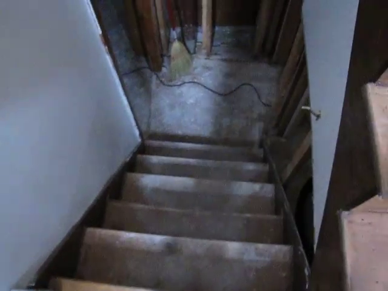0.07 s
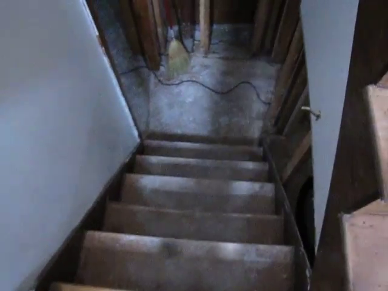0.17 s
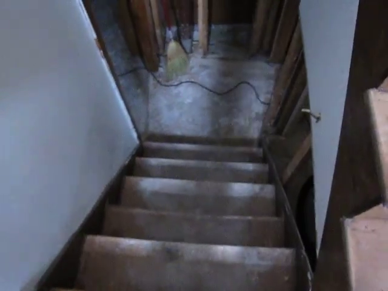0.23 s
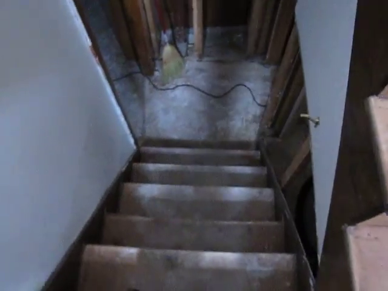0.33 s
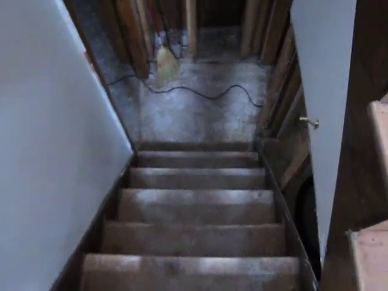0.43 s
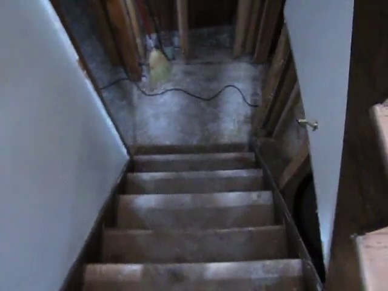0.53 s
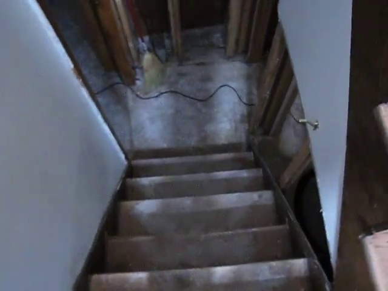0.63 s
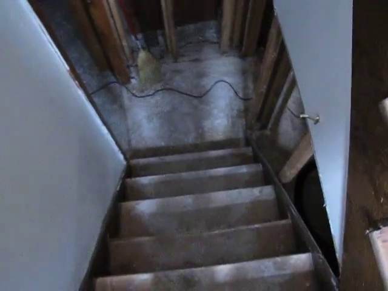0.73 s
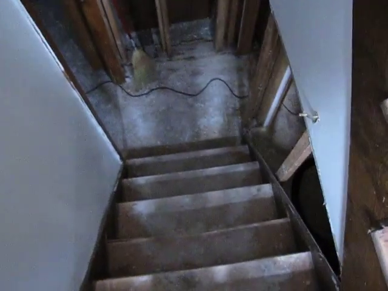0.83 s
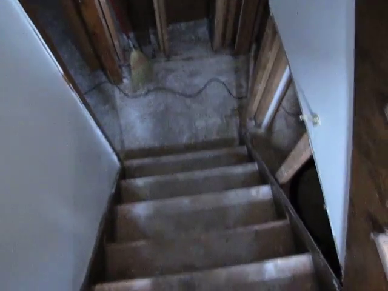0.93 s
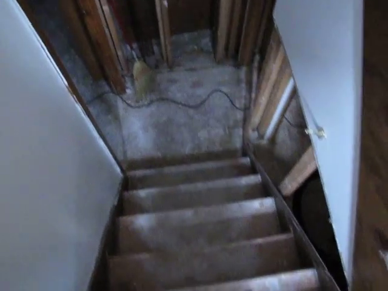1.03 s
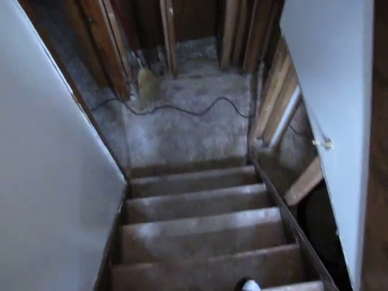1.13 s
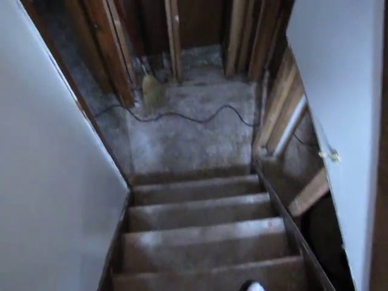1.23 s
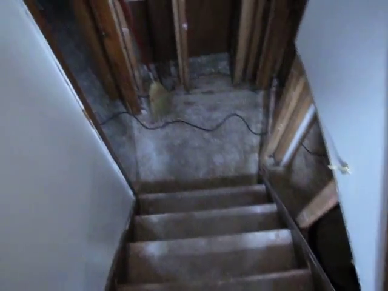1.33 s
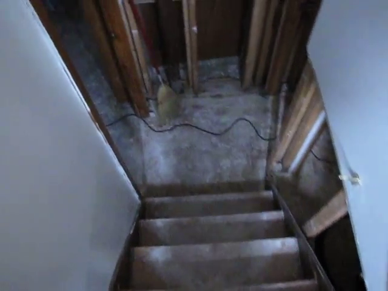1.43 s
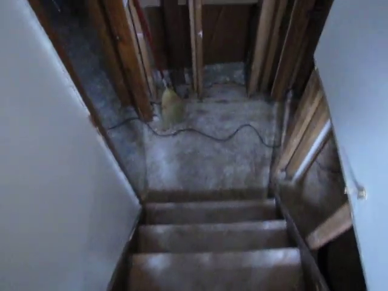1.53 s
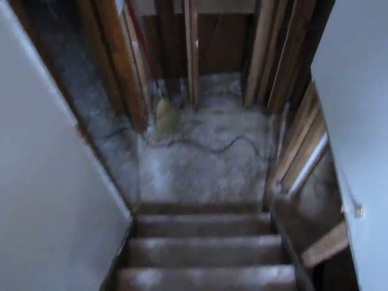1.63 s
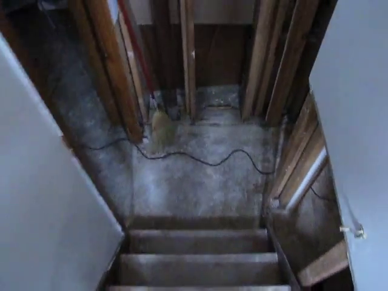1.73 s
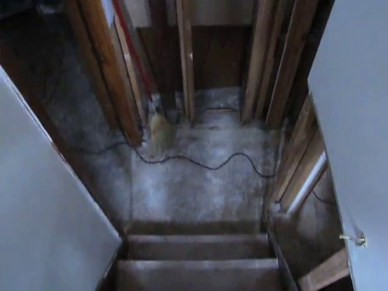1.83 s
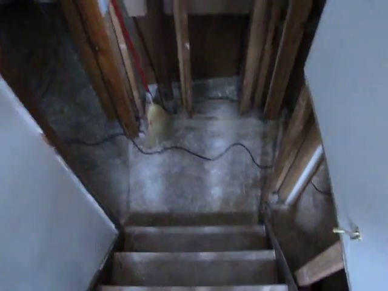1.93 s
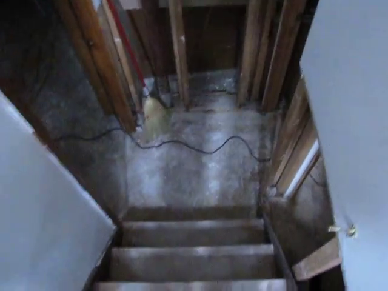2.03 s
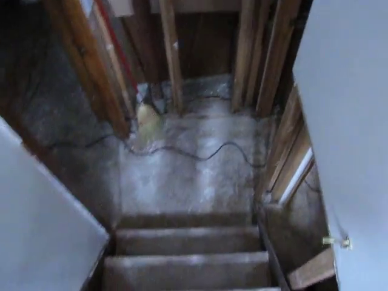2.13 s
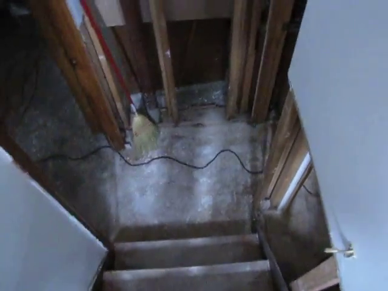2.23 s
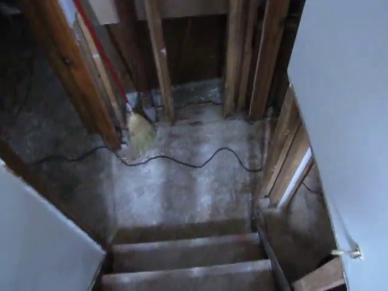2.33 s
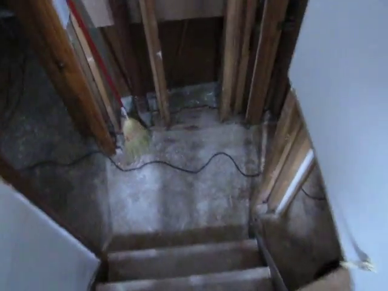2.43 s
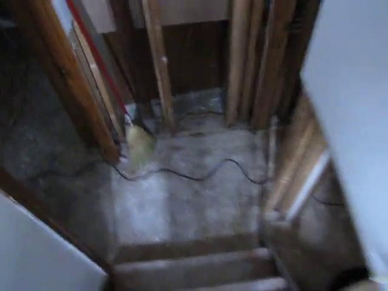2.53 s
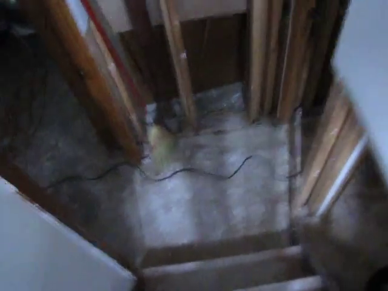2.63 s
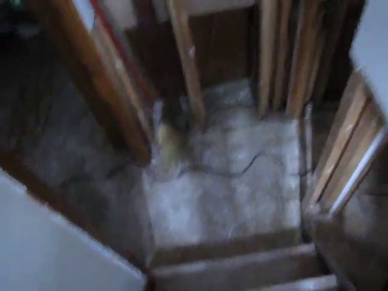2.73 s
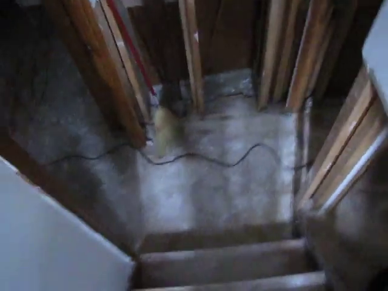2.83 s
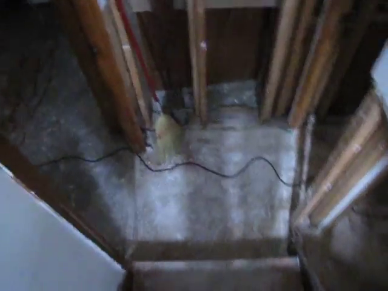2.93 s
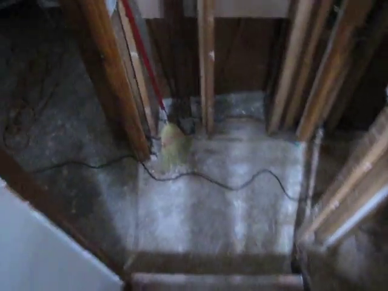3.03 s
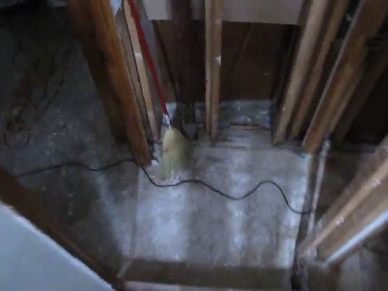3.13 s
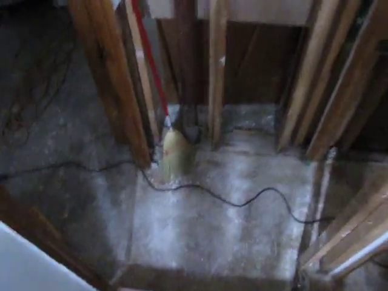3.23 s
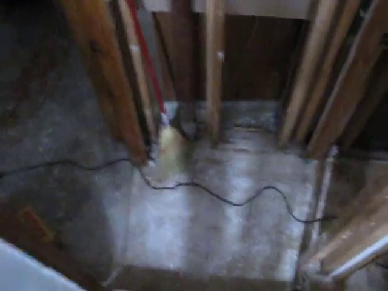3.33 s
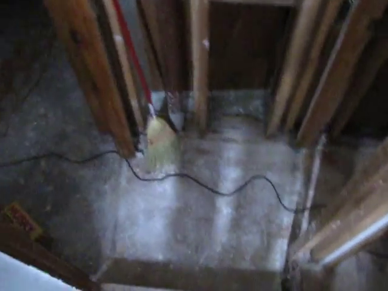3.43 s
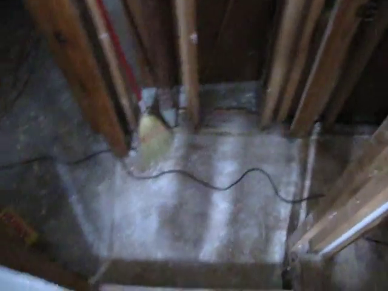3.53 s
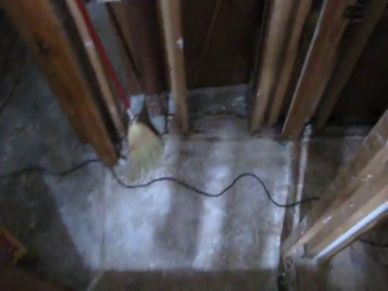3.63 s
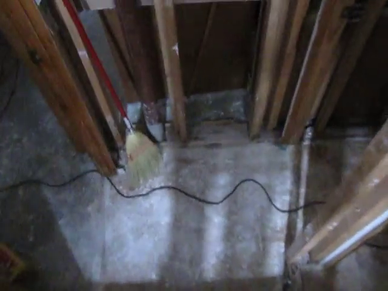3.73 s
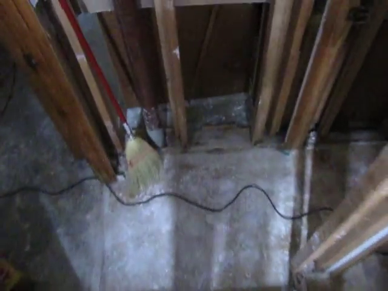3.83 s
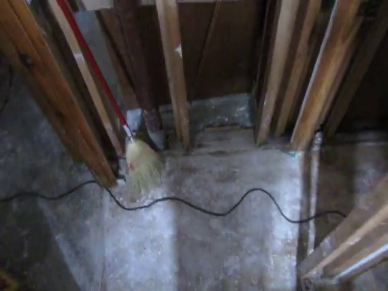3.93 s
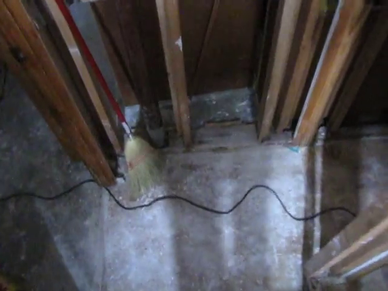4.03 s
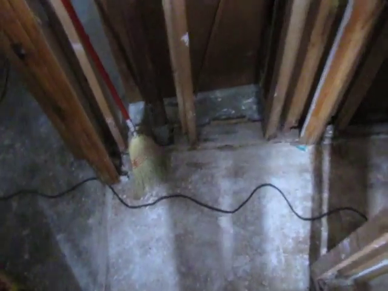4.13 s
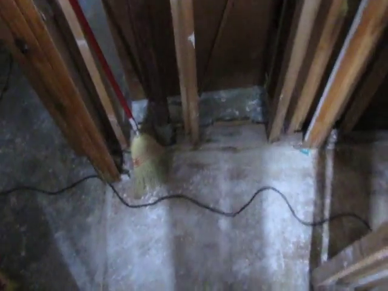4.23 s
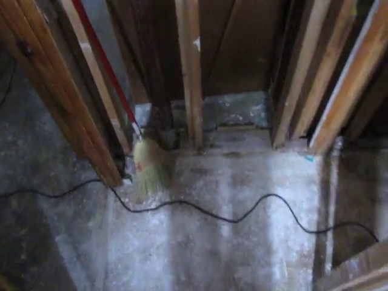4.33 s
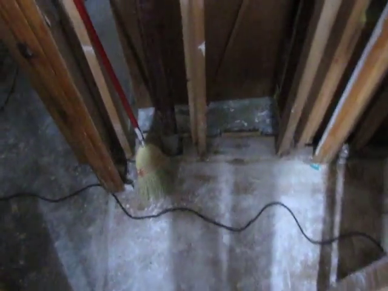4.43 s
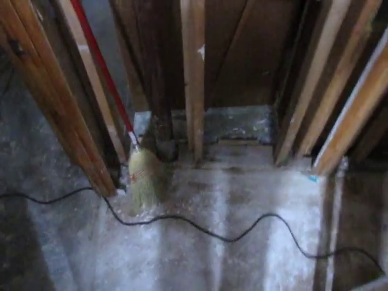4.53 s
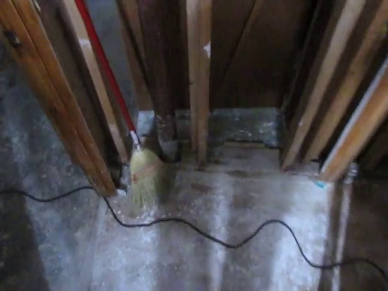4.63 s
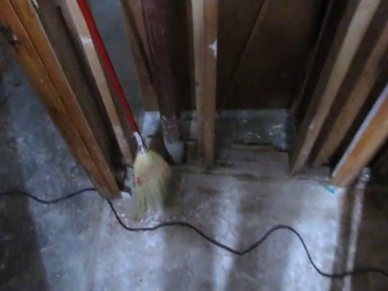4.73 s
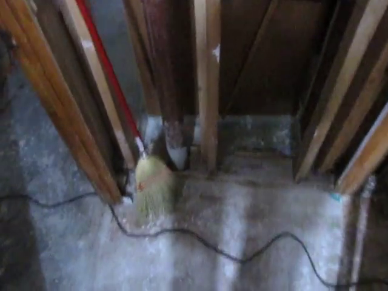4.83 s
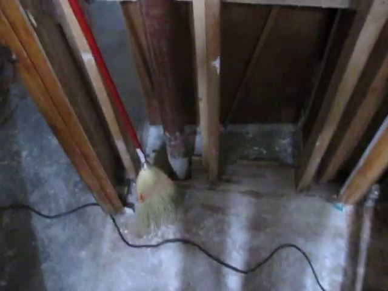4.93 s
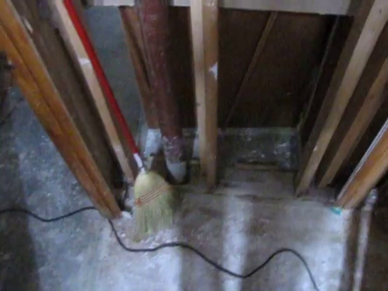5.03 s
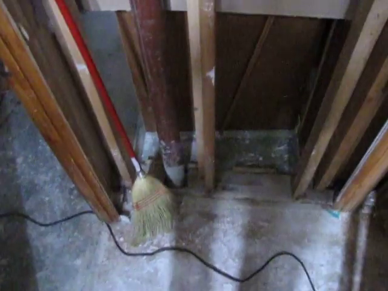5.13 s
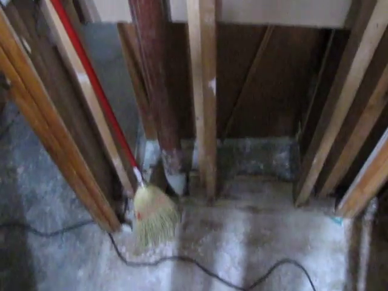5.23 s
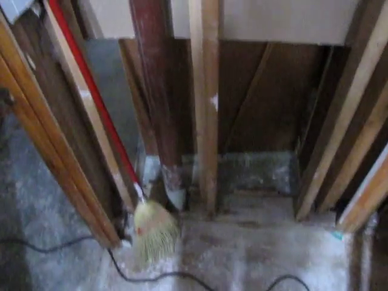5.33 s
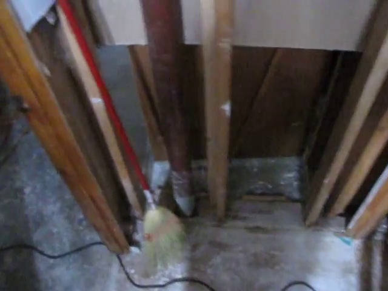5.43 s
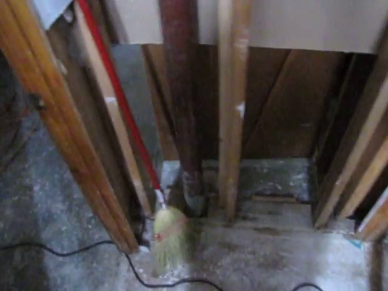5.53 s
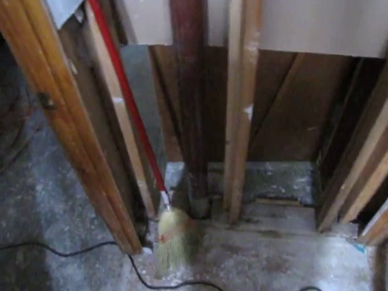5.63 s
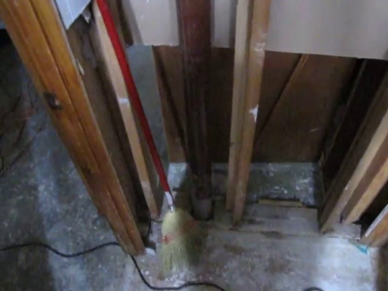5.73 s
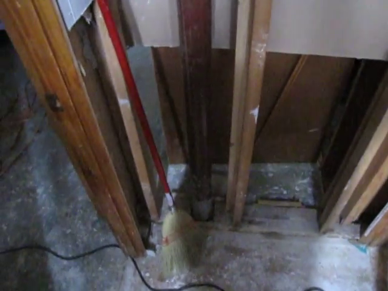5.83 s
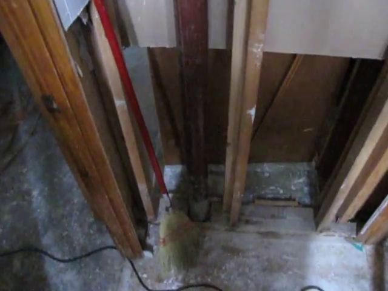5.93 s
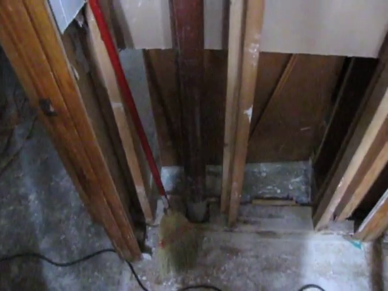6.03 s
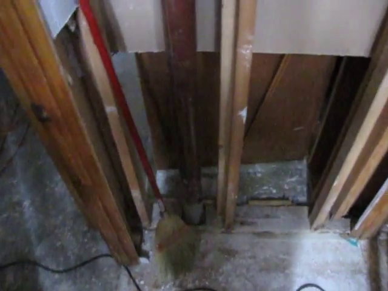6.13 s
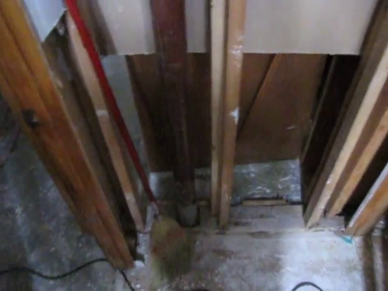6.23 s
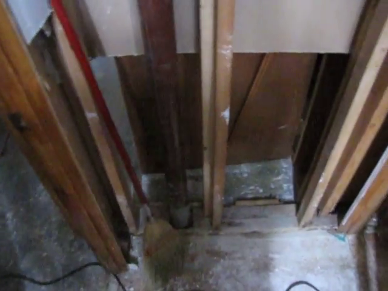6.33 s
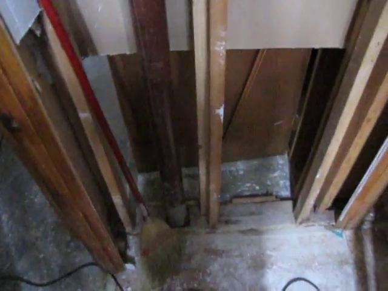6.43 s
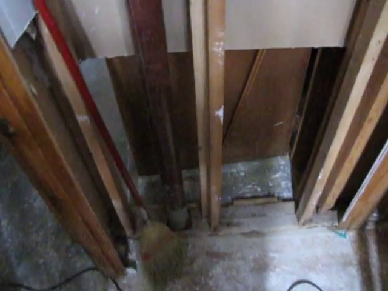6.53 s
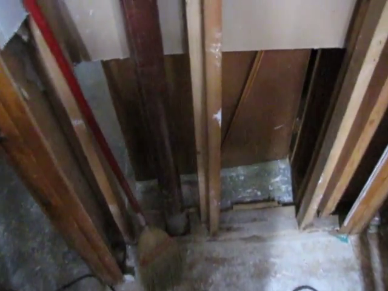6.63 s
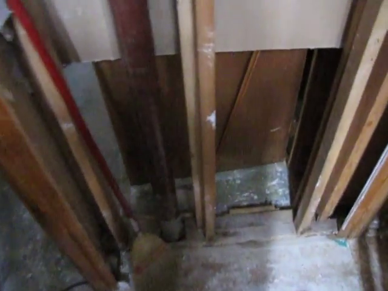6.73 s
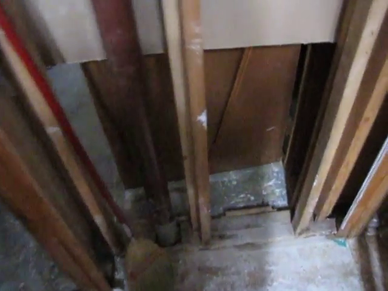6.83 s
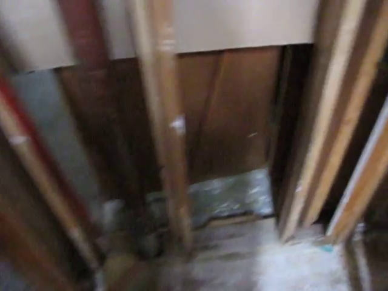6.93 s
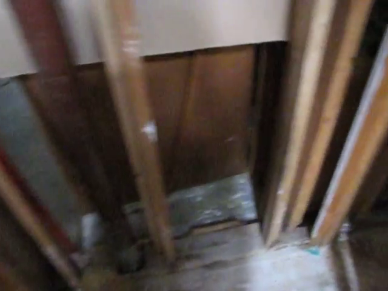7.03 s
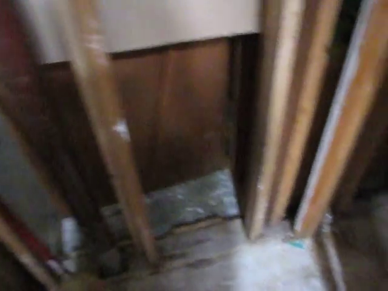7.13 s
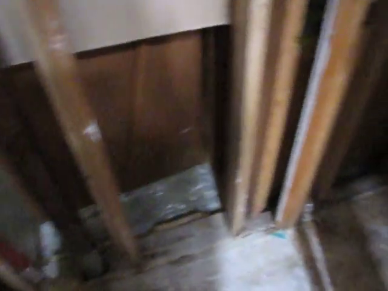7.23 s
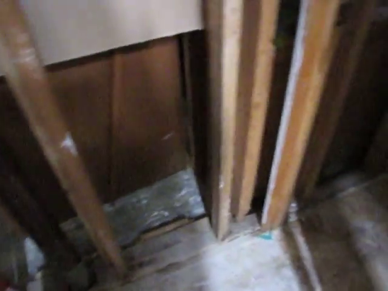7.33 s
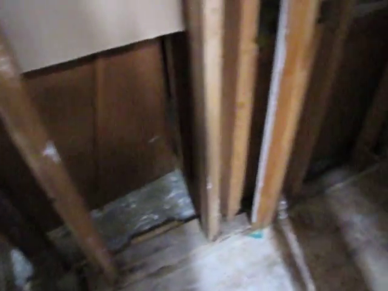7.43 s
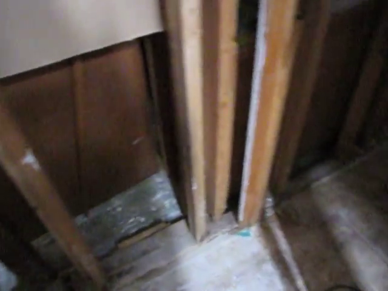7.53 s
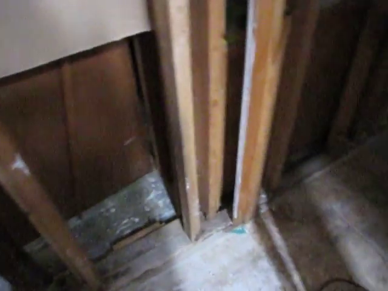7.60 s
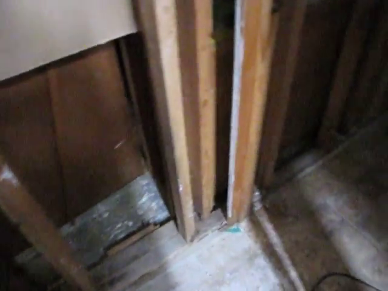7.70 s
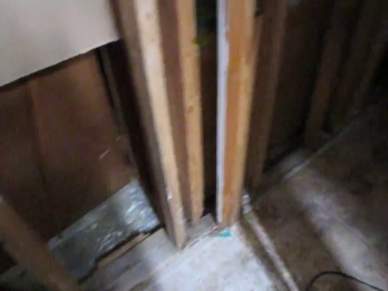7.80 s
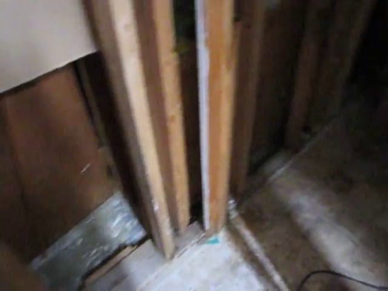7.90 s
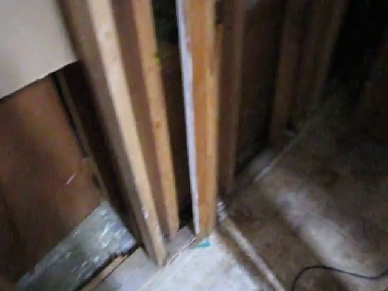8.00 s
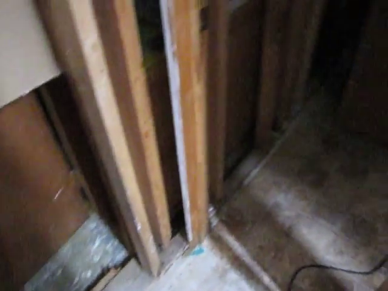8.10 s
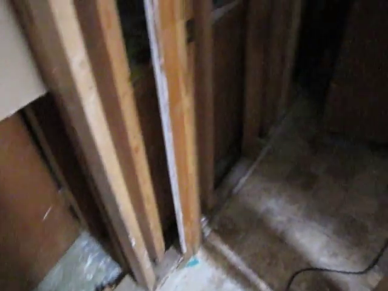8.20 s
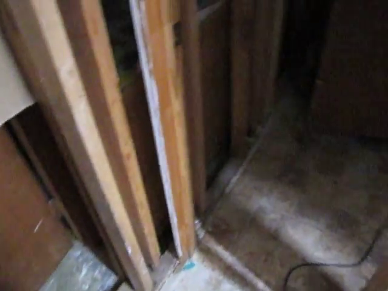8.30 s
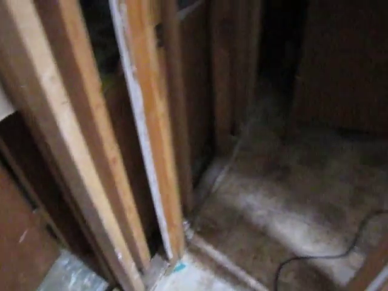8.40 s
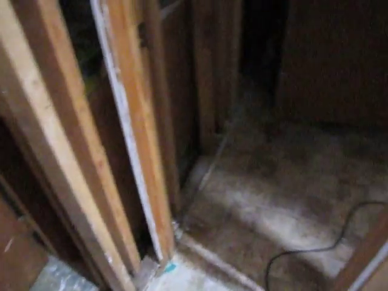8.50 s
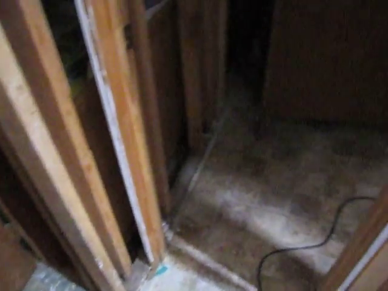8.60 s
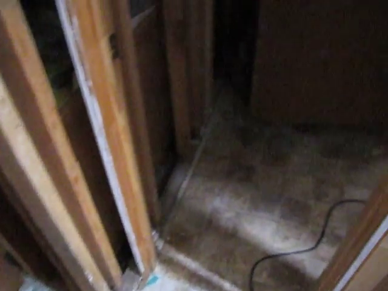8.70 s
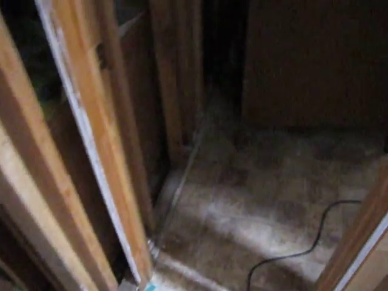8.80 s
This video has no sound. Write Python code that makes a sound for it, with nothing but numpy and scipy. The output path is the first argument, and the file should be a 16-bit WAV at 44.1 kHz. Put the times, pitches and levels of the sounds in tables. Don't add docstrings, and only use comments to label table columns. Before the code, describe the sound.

Someone goes down bare wooden stairs into a basement, heard close in stereo. A faint gritty scuff opens, then from 0.4 to 0.8 s a cluster of hollow knocks and pats on the landing boards. Between 1.0 and 1.55 s loose joints pop and crack in quick succession, and at about 1.65 s a tread sags with a short falling note under a heavy low boom. Paired knocks follow near 2.0, 2.1, 2.3 and 2.5 s, another deep thud at 3.2 s, and sharp gritty slaps around 3.9 to 4.0 s. A dense rattle of woody knocks runs from 4.4 to 4.9 s, with a last soft tread at 5.3 s. Then it is nearly quiet: a light tap at 6.8 s, dull shoe rubs on concrete around 7, a small click at 7.8 and tiny ticks until 8.75 s. Short stairwell echoes, faint hiss and low rumble throughout.

```python
import sys
import numpy as np
from scipy import signal
from scipy.fft import rfft, irfft
from scipy.io import wavfile

SR = 44100
rng = np.random.default_rng(int(sys.argv[2]) if len(sys.argv) > 2 else 0)


def output_pcm(signal):
    pcm = np.clip(np.atleast_2d(signal).T, -1, 1) * 32767
    wavfile.write(sys.argv[1], SR, np.round(pcm).astype(np.int16))


def attenuation_scalar(level_db):
    decades = np.asarray(level_db, float) / 20
    return 10 ** decades


N = 390705

# [f/Hz, level per Hz/dB]
AIR_SPECTRUM = [(12, -37), (20, -21), (53, -8), (71, -0.5), (195, -15), (332, -11.5), (616, -17.5),
                (863, -15.5), (1510, -20.5), (3140, -24.5), (5070, -23), (14700, -38), (16500, -56)]
# [f/Hz, correlation]
AIR_LIKENESS = [(60, 0.85), (180, 0.54), (550, 0.44), (1650, 0.3), (4970, -0.072), (15000, 0.65)]
KNOCK_LIKENESS = [(60, 0.97), (150, 1), (380, 0.97), (950, 0.87), (2380, 0.43), (5980, 0.59), (15000, 0.53)]
# [f/Hz, left minus right/dB]
LEAN = [(60, -0.5), (180, -1), (550, -0.5), (1650, -2), (4970, -2), (15000, 0.5)]
# [t/s, level/dB]
RUMBLE = [(0.0, -46.5), (0.96, -50), (2.49, -48), (3.06, -51), (3.28, -45), (6.1, -60.5), (7.33, -48),
          (8.86, -57)]
# [t/s, peak/dB, f/Hz, t60/s]
BOOMS = [(0.448, -34, 97, 0.3), (0.719, -34, 59.2, 0.3), (1, -32, 75, 0.41), (1.229, -46, 51.1, 0.3),
         (1.419, -40, 90.5, 0.26), (1.667, -10, 63, 0.2), (1.953, -41, 103, 0.17), (2.121, -31, 90.4, 0.22),
         (2.319, -40, 88.8, 0.15), (2.522, -19, 69.7, 0.36), (2.661, -23.5, 64.4, 0.27),
         (3.181, -10, 68, 0.37), (3.328, -34, 71.4, 0.3), (3.748, -35, 68, 0.33), (3.907, -28, 66, 0.64),
         (3.998, -29, 59, 0.36), (4.388, -33, 73, 0.17), (4.616, -27, 98.4, 1), (4.7, -19, 56.5, 0.23),
         (4.929, -39, 60, 0.17), (5.285, -60, 93, 0.36)]
# [t/s, peak/dB, from f/Hz, to f/Hz, t60/s]
SAGS = [
    (1.621, -20, 336, 240, 0.38),
    (5.268, -28, 398.5, 350, 0.3),
]
# [start t/s, length/s, level/dB]
DULL_RUBS = [
    (.26, .17, -49),
    (6.9, 0.18, -53.5),
    (7.05, 0.35, -43),
    (7.19, .12, -46),
    (8.07, 0.074, -62),
]
# [start t/s, length/s, level/dB]
GRITTY_RUBS = [(-.08, 0.11, -45.5), (4.07, 0.054, -26), (3.2, .09, -33), (4.58, .19, -31), (3.85, .05, -34),
               (.25, 0.18, -37.5), (1.63, 0.16, -35.5), (6.86, .21, -46.5), (7.29, 0.083, -52),
               (7.93, 0.091, -53), (8.29, 0.16, -46)]
# [f/Hz, width/Hz, level/dB]
DULL_DRAG = [(185, 16, 3), (346, 53, 1.5), (414, 22, -5), (1230, 29, -12), (1350, 29, -10), (1725, 70, -10),
             (1880, 80, -14)]
# [f/Hz, level per Hz/dB]
GRITTY_DRAG = [(500, -22), (1200, 0), (2500, 3), (4000, 0.5), (7000, -6), (12000, -14), (16000, -20)]
# [t/s, peak/dB]
POPS = [(.4635, -15), (.9893, -12), (1.0462, -13), (1.1135, -13.5), (1.161, -12), (1.2233, -16),
        (1.4162, -10), (1.4896, -19), (1.521, -19.5), (1.5465, -19.5), (.770, -17)]
# [delay/s, f/Hz, level/dB, t60/s]
POP_VOICE = [
    (0, 1444, -3, 0.015),
    (.0006, 2520, -3.5, 0.015),
    (.0012, 3500, -6, 0.0065),
    (.0071, 925, -4, .02),
    (.021, 228, -9, .13),
    (.0075, 2430, -16, 0.01),
]
# [t/s, peak/dB, f/Hz]
PATS = [(.430, -18, 560), (.490, -12, 600), (.513, -18, 513), (.541, -17, 626), (.578, -12, 620),
        (.702, -6, 520), (.724, -10, 620), (.740, -10, 600), (1.953, -14, 800), (1.960, -14, 950),
        (1.967, -17, 450), (2.106, -17, 800), (2.114, -16, 950), (3.140, -19, 700), (3.188, -15, 1900),
        (3.309, -19, 600), (3.836, -24, 500), (4.380, -12, 420), (4.394, -17, 400), (6.809, -27, 1250),
        (6.810, -28, 450), (2.308, -12, 900), (2.530, -19, 900), (2.536, -16, 1100), (4.592, -18, 980),
        (4.598, -9, 700), (4.627, -12, 990), (4.654, -20, 810), (4.670, -7, 1100), (4.692, -13, 910),
        (4.709, -14, 910), (4.742, -18, 800), (4.765, -10, 810), (4.828, -14.5, 804), (4.928, -17, 920),
        (5.267, -22, 430), (7.8, -26, 2500), (7.808, -24, 2560), (7.809, -30, 3090), (7.812, -32, 4600),
        (8.076, -49, 750), (8.107, -49, 750), (8.131, -44, 750), (8.160, -45, 750), (8.187, -44, 750),
        (8.216, -44, 750), (8.266, -46, 750), (8.295, -43, 750), (8.354, -51, 750), (8.386, -40, 750),
        (8.635, -48, 750), (8.665, -41, 900), (8.745, -43, 890)]
# [f/Hz, level/dB, t60/s]
LANDING = [(218.5, -3.5, .69), (472, -2, .5), (545, -2, 0.23), (625, -4, .72), (1516, -11.5, .77),
           (1656, -12, 0.11), (3300, -13, 0.27)]
TOP_TREAD = [(225, -3, .5), (403.5, -4.5, .5), (524, -16, .65), (635, -4.5, .68), (810, -14, 0.2),
             (1003, -9, 0.54), (1297, -5, 0.58), (2450, 0.5, 0.021), (3200, -11, 0.12), (4340, -62, .18)]
UPPER_TREAD = [(143, -10, 0.27), (483, 5.5, 0.056), (590, -6, 0.062), (907, 4, 0.18), (1127, -3.5, 0.24),
               (1532, -5.5, 0.35), (1840, -25, 0.11), (2050, -8, 0.2), (3556, -5.5, 0.066)]
MIDDLE_TREAD = [(218, -7, .5), (423, -2.5, 0.6), (1080, -13, .54), (1250, -31, 0.12), (1523, 4, 0.044),
                (1720, -3, 0.18), (2630, -16, 0.056), (3290, -17, 0.077), (3790, -5.5, 0.059)]
LOWER_TREAD = [(239, 0.5, 0.5), (347, 5, 0.3), (430, -3, .3), (503.4, 0, 0.4), (874, -6.5, 0.32),
               (1108, 4.5, 0.072), (1506, -2, 0.16), (2155, -4.5, 0.22), (2400, -12, 0.25),
               (3200, -9, 0.19)]
BOTTOM_TREAD = [(192, 2, 0.28), (354, 4.3, 0.46), (418, 7.8, 0.52), (517, 4, 0.24)]
BOARD_FROM_S = [0, .9, 1.7, 3.0, 4.3, 5.2]
# [t/s, level/dB, weight/dB, bite/dB]
CREAKS = [(.462, -21.5, 1, 2), (.723, -13, -9, -10.5), (.769, -22, -0.5, 1), (.988, -20.5, 2, 3.5),
          (1.112, -20, -1.5, 3.5), (1.16, -23, 3.5, 4.5), (1.221, -22, 3, 3.5), (1.415, -20, 3, 7.5),
          (1.487, -25, 1, 0.5), (1.521, -25.5, 4, 0.5), (1.546, -22, 1, -4), (1.62, -25.5, 7, -9),
          (2.534, -27, 6.5, 0), (2.942, -64.5, 25, 26), (3.138, -24, 2.5, -8), (3.367, -23, 2.5, -8.5),
          (3.524, -31.5, 2, -2.5), (3.965, -27.5, 1.5, -2), (4.354, -32.5, -11, 3), (4.379, -21, -2, -9),
          (4.624, -19, -13, -7), (4.652, -21.5, -0.5, -7), (4.69, -17.5, -6, -8), (4.71, -20, -6, -11),
          (4.739, -18.5, -6.5, -9), (4.763, -20.5, -8, -5.5)]
# [t/s, level/dB, weight/dB, bite/dB]
HEELS = [(.427, -21.5, -0.5, -3), (.513, -19.5, -1.5, -17), (.541, -27, -1, -17), (.701, -18, -0.5, 2),
         (.746, -39.5, 20, 15), (1.046, -23.5, 3.5, 5), (1.665, -30, 10.5, 3.5), (1.717, -37.5, 17, 5),
         (1.9515, -21, -2, -1), (2.1045, -23, -0.5, -1), (2.305, -20.5, -0.5, 0), (2.527, -20.5, -1, -0.5),
         (3.160, -26.5, 2, 10.5), (3.907, -38.5, 19.5, -4), (3.982, -40, -8, 15), (4.1, -34.5, 6.5, -17),
         (4.249, -58, -12, 14.5), (4.592, -20, -8, -5), (4.668, -16.5, -33, -3.5), (4.825, -18, -3, -10),
         (4.924, -18, -3, -9), (5.353, -60.5, 26, 23.5)]
# [t/s, level/dB, weight/dB, bite/dB]
SLAPS = [(.232, -30.5, -8, 11), (.311, -39.5, 5, 9.5), (.357, -44.5, 13, 10), (.49, -30, 8, 8.5),
         (.577, -24, -2, -8.5), (.65, -40, -17, 5), (1.390, -34, 6, 2), (1.645, -33.5, 11, -15),
         (1.769, -35, 8, -13), (1.792, -24, 3.5, 9), (2.477, -45.5, 25, 3), (2.519, -23, -3, -10),
         (2.558, -45, -12, 10), (2.619, -24.5, 1, 8), (2.689, -34, -9, 6.5), (3.186, -20, -0.5, 3),
         (3.307, -28, 7, -6), (3.347, -36, 4.5, 5), (3.726, -31, -1, -6), (3.833, -28, 4.5, -12),
         (3.901, -17.5, -8.5, 3), (3.994, -19.5, -30, -0.5), (4.115, -41, -5, 11.5), (4.582, -42, 16, -20),
         (4.964, -51.5, -4, 21), (5.265, -44.5, 15, 2.5)]
# [t/s, level/dB, weight/dB, bite/dB]
CONCRETE_TOUCHES = [(6.033, -47.5, 3, 2), (6.219, -50, 4, 5.5), (6.808, -25.5, -6, -4),
                    (7.089, -64.5, 22, 21), (7.352, -45.5, -8, 0), (7.368, -41, -15.5, 6),
                    (7.38, -65, -11, 0), (7.799, -56.5, -14, 25), (7.807, -47.5, -20, 21.5)]
# [t/s, level/dB, weight/dB,
# bite/dB]
SNAPS = [(2.62, -19, -4, 11.5), (2.6255, -25, 4, 11.5), (3.167, -31, -3, 5), (3.192, -25.5, -4, 7),
         (3.351, -40, -9, 11), (2.529, -33, -9, 2), (4.673, -30, -9, 5.5), (3.731, -40, -9, 8),
         (3.314, -38, -9, 6), (4.830, -30, -9, 4), (4.928, -30, -9, 5), (1.960, -32, -9, 6),
         (7.808, -46, -12, 21), (3.907, -21.5, -27, 8.5), (3.999, -22.5, -10, 3), (4.116, -37, 7, 7),
         (4.598, -16.5, -10, -9)]
# [t/s, level/dB, bite/dB]
NEAR_TICKS = [(6.699, -47, -8), (7.614, -52.5, 3), (7.909, -50, 5), (7.943, -77, 37), (8.002, -70, 27),
              (8.106, -49, -18), (8.161, -50, -4), (8.188, -49, -12), (8.215, -49.5, -9), (8.265, -53, -7),
              (8.294, -50, -10), (8.385, -45, -15), (8.664, -43, -11), (8.743, -45, -11), (.087, -69, 19),
              (.147, -72, 6), (.388, -41, 7), (8.194, -60, 19), (7.926, -70, 18)]
COLOUR_HZ = [220, 800, 2800, 8500]
# [f/Hz, level/dB]
CRACK = [(35, -22), (60, -4), (150, 2), (400, 11), (1000, 15), (2500, 17), (6000, 18), (10000, 16),
         (15000, 5)]
# [f/Hz, level/dB]
TAIL = [(35, -29), (60, -10.5), (150, 1), (300, 6), (1000, 6.5), (2500, 3.5), (6000, 6.5), (10000, -6.5),
        (15000, -14)]
# [f/Hz, t60/s]
QUICK_T60 = [(200, 0.018), (1000, 0.18), (4000, 0.044), (12000, 0.045)]
STAIRWELL_T60 = [(60, 0.9), (160, 0.59), (420, 0.37), (1100, 0.32), (2910, 0.28), (7680, 0.19)]

BURST_S = 0.0025


def at_hz(points, hz):
    table = np.array(points)
    return np.interp(np.log(hz), np.log(table[:, 0]), table[:, 1])


def rms_one(x):
    return x / np.sqrt(np.mean(x ** 2) + 1e-20)


def drift(rate_hz):
    r = np.exp(-80 * np.pi * rate_hz / SR)
    slow = signal.lfilter([1], [1, -2 * r, r * r], rng.standard_normal(N // 40 + 2002))[2000:]
    return np.interp(np.arange(N) / 40, np.arange(len(slow)), rms_one(slow))


def train(seconds, sizes):
    at = np.clip(np.round(np.ravel(seconds) * SR).astype(int), 0, N - 1)
    return np.bincount(at, np.ravel(sizes), N) + 1e-18


def ring(clicks, hz, t60):
    r, w = attenuation_scalar(-60 / (t60 * SR)), 2 * np.pi * hz / SR
    return signal.lfilter([0, np.sin(w)], [1, -2 * r * np.cos(w), r * r], clicks)


def resonate(x, hz, width_hz):
    r = np.exp(-np.pi * width_hz / SR)
    top = np.array([1, 0, -1]) * (1 - r * r) / 2
    return signal.lfilter(top, [1, -2 * r * np.cos(2 * np.pi * hz / SR), r * r], x)


def bands():
    edges_hz = 22 * 2 ** np.arange(0, 9.8, .5)
    for low, high in zip(edges_hz, edges_hz[1:]):
        yield np.sqrt(low * high), signal.butter(2, [low, high], "band", fs=SR, output="sos")


def pair(mid, side, likeness, hz):
    alike = np.clip(at_hz(likeness, hz), -1, 1)
    lean = attenuation_scalar(at_hz(LEAN, hz) / 2 * np.array([[1], [-1]]))
    shared = np.sqrt(1 + alike) * mid
    opposed = np.sqrt(1 - alike) * side * [[1], [-1]]
    return lean * (shared + opposed) / np.sqrt(2)


def stereo_noise(spectrum, patchy_db):
    out, together = 0, drift(23)
    white = rng.standard_normal((2, 2, N + 4000))
    for k, (hz, sos) in enumerate(bands()):
        flicker_db = patchy_db * min(1, 900 / hz) * (together + drift(11.0))
        mid, side = signal.sosfilt(sos, white[k % 2])[:, 4000:]
        out = out + attenuation_scalar(at_hz(spectrum, hz) + flicker_db) * pair(mid, side, AIR_LIKENESS, hz)
    return rms_one(out)


def room_air():
    return attenuation_scalar(-52) * stereo_noise(AIR_SPECTRUM, patchy_db=1.04)


def rumble():
    s, level_db = np.transpose(RUMBLE)
    low = resonate(resonate(rng.standard_normal(N + SR), 40.3, 58), 45, 50)[SR:]
    return attenuation_scalar(np.interp(np.arange(N) / SR, s, level_db - 4)) * rms_one(low)


def booms(swell_s=0.027, partner=0.92):
    out, t = np.zeros(N), np.arange(SR // 2) / SR
    for s, peak_db, hz, t60 in BOOMS:
        shape = (1 - np.exp(-t / swell_s)) * attenuation_scalar(peak_db + 2 - 60 * t / max(t60, .05))
        wave = np.sin(2 * np.pi * hz * t) + 0.39 * np.sin(2 * np.pi * partner * hz * t)
        start = round(s * SR)
        out[start:start + len(t)] += shape * wave
    return out


def sags(slide_s=0.05, swell_s=0.0069):
    out, t = np.zeros(N), np.arange(SR // 2) / SR
    for s, peak_db, from_hz, to_hz, t60 in SAGS:
        hz = to_hz + (from_hz - to_hz) * np.exp(-t / slide_s)
        shape = (1 - np.exp(-t / swell_s)) * attenuation_scalar(peak_db - 60 * t / t60)
        start = round(s * SR)
        out[start:start + len(t)] += shape * np.sin(2 * np.pi * np.cumsum(hz) / SR)
    return out


def rubbing(rubs, attack_s=0.047, release_s=0.04):
    t, out = np.arange(N) / SR, 0
    for s, length, level_db in rubs:
        swell = (t - s) / attack_s
        let_go = 1 - (t - s - length) / release_s
        out = out + attenuation_scalar(level_db) * np.clip(np.minimum(swell, let_go), 0, 1) ** 2
    return out


def shuffle():
    slips = rng.standard_normal(N) * (rng.random(N) < 4000 / SR)
    dull = rms_one(sum(attenuation_scalar(level_db) * resonate(slips, hz, width) for hz, width, level_db in DULL_DRAG))
    grit = stereo_noise(GRITTY_DRAG, patchy_db=-4.5)
    return attenuation_scalar(-5.5) * rubbing(DULL_RUBS) * dull + attenuation_scalar(-6) * rubbing(GRITTY_RUBS) * grit


def pops_and_pats(pat_cycles=10.3, echo_s=0.00558, echo_db=-2.5, swell_cycles=0.57):
    notes = [(s + delay, peak_db + level_db, hz, t60)
             for s, peak_db in POPS for delay, hz, level_db, t60 in POP_VOICE]
    notes += [(s + echo * echo_s, peak_db + echo * echo_db, hz, pat_cycles / hz)
              for s, peak_db, hz in PATS for echo in (0, 1)]
    out, t = np.zeros((2, N)), np.arange(SR // 20) / SR
    for (s, peak_db, hz, t60), chance in zip(notes, rng.standard_normal((len(notes), 2))):
        shape = (1 - np.exp(-t * hz / swell_cycles)) * attenuation_scalar(peak_db + 2.5 - 60 * t / t60)
        turn = 2 * np.pi * hz * (1 + .02 * chance[0]) * t
        mid, side = shape * np.sin(turn), shape * np.cos(turn) * np.sign(chance[1])
        start = round(s * SR)
        out[:, start:start + len(t)] += pair(mid, side, KNOCK_LIKENESS, hz)
    return out


def contacts(rows, sheen_db):
    return [(s, level_db, weight_db, bite_db, sheen_db + bite_db) for s, level_db, weight_db, bite_db in rows]


def on_wood():
    return sorted(contacts(CREAKS, -23) + contacts(HEELS, -11.5) + contacts(SLAPS, -1.5))


def colour_db(rows, hz):
    weight, body, bite, sheen = [np.interp(np.log(hz), np.log(COLOUR_HZ), one) for one in np.eye(4)]
    return rows[:, 1] + rows[:, 2:] @ [weight, bite, sheen]


def boards(ring_db=-5, spread_db=4, damping=0.54, longest_s=.26):
    rows, out = np.array(on_wood()), np.zeros(N)
    board = np.searchsorted(BOARD_FROM_S, rows[:, 0]) - 1
    chance = rng.standard_normal((len(rows), 10))
    flight = [LANDING, TOP_TREAD, UPPER_TREAD, MIDDLE_TREAD, LOWER_TREAD, BOTTOM_TREAD]
    for k, modes in enumerate(flight):
        for m, (hz, level_db, t60) in enumerate(modes):
            blow_db = colour_db(rows, hz) + level_db + ring_db + spread_db * chance[:, m]
            clicks = train(rows[:, 0] + BURST_S, attenuation_scalar(blow_db) * (board == k))
            out += ring(clicks, hz, min(damping * t60, longest_s))
    return out


def click_pattern(wet, close):
    chance = rng.random((len(wet), 3, 10))
    click = np.arange(10)
    echo = click >= 4
    direct_s = 0.000984 + BURST_S * (click + chance[:, 0]) / 4
    wall_s = .006 + .007 * chance[:, 0] ** 1.4
    swing = chance[:, 1:] - .5
    sizes = np.sign(swing) * (.3 + abs(swing))
    sizes *= np.where(echo, attenuation_scalar(-9) * wet[:, None, None], [[1], [.3]])
    lead_db = np.where(close, 6, 2)
    sizes[:, 0, 0] = attenuation_scalar(lead_db) * .6 * np.sign(sizes[:, 0, 0])
    return np.where(echo, wall_s, direct_s), sizes


def knocks(rise_s=.003, early_db=-7, near_db=-10, room_s=.005):
    far = on_wood() + contacts(CONCRETE_TOUCHES, -4)
    ticks = [(s, level_db, -40, bite_db) for s, level_db, bite_db in NEAR_TICKS]
    rows = np.array(far + contacts(SNAPS, -4.5) + contacts(ticks, -9))
    close = np.arange(len(rows)) >= len(far)
    wet = attenuation_scalar(near_db * close)
    delays, sizes = click_pattern(wet, close)
    build = np.exp(-1 / (rise_s * SR))
    white, out = rng.standard_normal((2, 2, N)), 0
    for k, (hz, sos) in enumerate(bands()):
        strength = attenuation_scalar(colour_db(rows, hz))
        clicks = [train(rows[:, :1] + delays, strength[:, None] * sizes[:, c]) for c in (0, 1)]
        soften = signal.butter(2, min(1.48 * hz, 16000), fs=SR, output="sos")
        first = signal.sosfilt(np.vstack([sos, soften]), clicks)
        first = first * attenuation_scalar(at_hz(CRACK, hz)) * SR / hz
        blows = train(rows[:, 0] + room_s, (wet * strength) ** 2)
        decays = [(at_hz(STAIRWELL_T60, hz), -9), (at_hz(QUICK_T60, hz), early_db), (.7, -33)]   # (t60/s, dB)
        power = 0
        for t60, level_db in decays:
            power = power + attenuation_scalar(2 * level_db) * signal.lfilter([1], [1, -attenuation_scalar(-120 / (t60 * SR))], blows)
        power = signal.lfilter([1 - build], [1, -build], power)
        tail = rms_one(signal.sosfilt(sos, white[k % 2])) * np.sqrt(power) * attenuation_scalar(at_hz(TAIL, hz))
        mid, side = first + tail
        out = out + pair(mid, side, KNOCK_LIKENESS, hz)
    return out


def scene():
    air = room_air()
    solid = rumble() + booms() + sags() + boards()
    solid = solid * attenuation_scalar(0) * np.array([[1], [1]]) * attenuation_scalar(np.array([[-.4], [.4]]))
    return air + solid + shuffle() + pops_and_pats() + attenuation_scalar(-9) * knocks()


def top_cut(x):
    return signal.sosfilt(signal.butter(12, 16790, fs=SR, output="sos"), x)


def record(dry, lag=1.8, lag_fades_hz=9000, top=.93):
    hz = np.fft.rfftfreq(N, 1 / SR)
    turn = 2 * np.pi * hz * lag / SR / np.hypot(1, hz / lag_fades_hz)
    late = irfft(rfft(dry[0]) * np.exp(-1j * turn), N)
    both = np.array([late, dry[1]])
    both = both / (1 + (both / top) ** 6) ** (1 / 6)
    both = signal.sosfilt(signal.cheby2(10, 50, 16800, fs=SR, output="sos"), both)
    return top_cut(both)


dry = scene()
out = record(dry)
output_pcm(out)
```